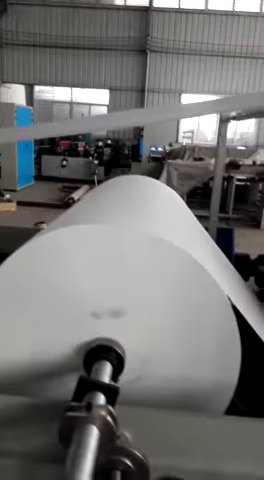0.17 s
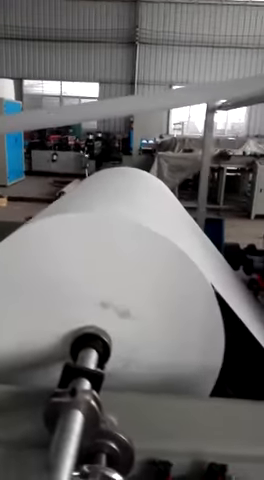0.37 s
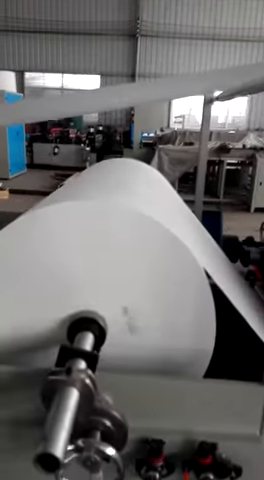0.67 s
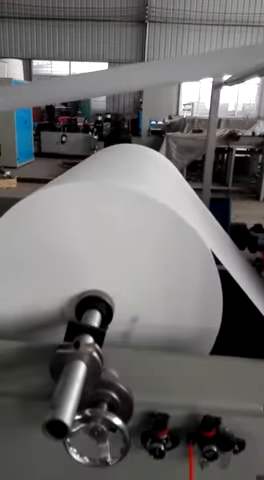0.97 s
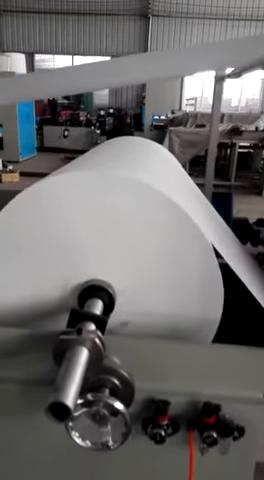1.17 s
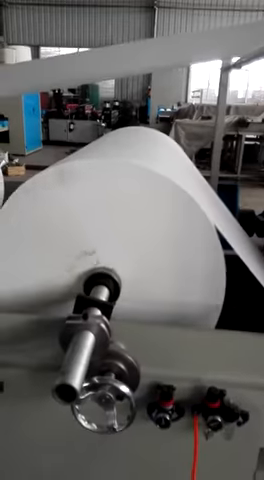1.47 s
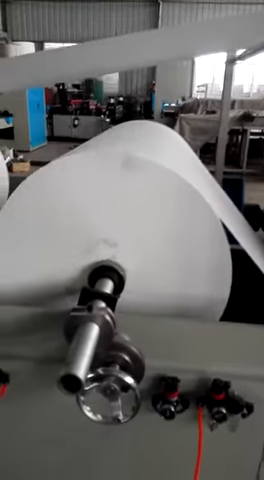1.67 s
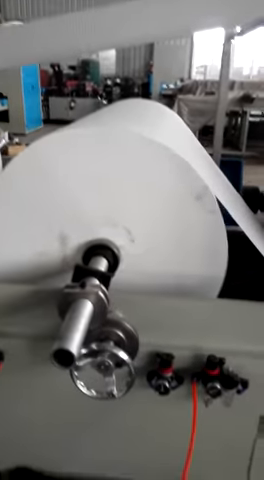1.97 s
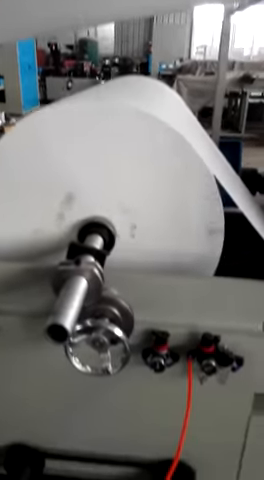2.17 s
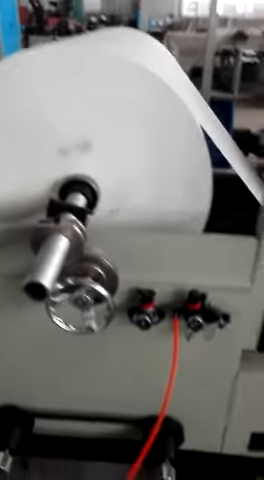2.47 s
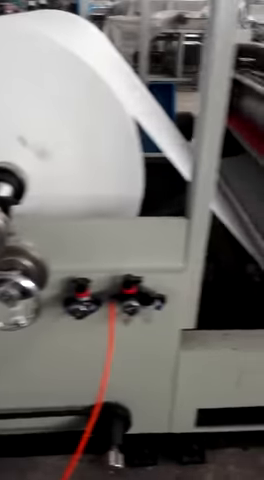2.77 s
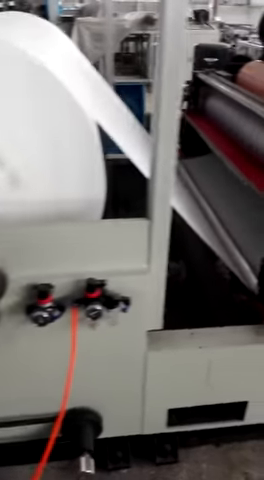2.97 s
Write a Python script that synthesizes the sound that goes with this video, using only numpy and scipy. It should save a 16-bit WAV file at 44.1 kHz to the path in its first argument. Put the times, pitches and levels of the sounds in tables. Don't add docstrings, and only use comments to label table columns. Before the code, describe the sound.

Paper converting machine running: strong constant low hum, quick mechanical knocks, airy roller noise, overdriven sound.

```python
import sys
import numpy as np
from scipy import signal
from scipy.io import wavfile
from scipy.ndimage import uniform_filter1d

SR = 44100
rng = np.random.default_rng(int(sys.argv[2]) if len(sys.argv) > 2 else 0)


def wav_record(signal):
    frames = np.transpose(np.atleast_2d(signal))
    bounded = np.clip(frames, -1, 1)
    quanta = np.round(bounded * 32767).astype(np.int16)
    wavfile.write(sys.argv[1], SR, quanta)


def decibels_to_gain(level_db):
    exponent = np.asarray(level_db, float) / 20
    return 10 ** exponent


N = 138033


def evened(x):
    return x / np.sqrt(np.mean(x ** 2) + 1e-20)


def resonate(x, hz, width):
    turn = np.exp(2j * np.pi * hz * np.arange(len(x)) / SR)
    r = np.exp(-np.pi * width / SR)
    return 2 * (turn * signal.lfilter([1 - r], [1, -r], x / turn)).real


def struck(start_s, rise_s, t60_s):
    t = np.maximum(np.arange(N) / SR - start_s, 0)
    decay = decibels_to_gain(-60 * np.minimum(t / t60_s, 3))
    return np.minimum(t / rise_s, 1) * decay


def drone():
    drone_hz, first_rise_s, drone_db = 125.495, .00098, .55
    wobble_hz, wobble_db = 30, -27
    t = np.arange(N) / SR - first_rise_s
    tone = np.sin(2 * np.pi * drone_hz * t)
    air = resonate(rng.standard_normal(N), drone_hz, wobble_hz)
    air = resonate(air, drone_hz, wobble_hz)
    return decibels_to_gain(drone_db) * tone + decibels_to_gain(wobble_db) * evened(air)


def knocks():
    # peak_s, peak_db
    blow_table = [(.075, -24.5), (0.093, -29), (0.259, -32.5), (0.311, -37.5), (.425, -30.5), (0.472, -26),
                  (.66, -38), (0.751, -32.5), (.865, -26.5), (.91, -28.5), (1.053, -24.5), (1.083, -31.5),
                  (1.271, -28.5), (1.384, -32), (1.535, -20.5), (1.684, -28), (1.718, -24), (1.849, -35),
                  (1.903, -31), (1.95, -25.5), (2.075, -32), (2.125, -21.5), (2.285, -31), (2.325, -31.5),
                  (2.49, -21), (2.574, -24.5), (2.675, -27), (2.747, -25), (2.918, -20.5), (3.083, -25.5)]
    # centre_hz, width_hz, level_db
    frame_modes = [(970, 100, -17.5), (1347, 570, 10.5), (2060, 1200, -11), (3140, 710, 9)]
    knock_rise_s, knock_t60_s, knock_db = .016, .18, 1.5
    clank_s, clank_db, clank_t60_s = 1.1665, -17.5, .045
    thump_hz, thump_db, thump_t60_s = 180, -19, .12

    rattle = rng.standard_normal(N)
    ringing = sum(decibels_to_gain(db) * evened(resonate(rattle, hz, width)) for hz, width, db in frame_modes)
    blows = sum(decibels_to_gain(db + knock_db) * struck(s - knock_rise_s / 2, knock_rise_s, knock_t60_s)
                for s, db in blow_table)
    clank = decibels_to_gain(clank_db) * struck(clank_s, .0006, clank_t60_s)
    thump_tone = np.sin(2 * np.pi * thump_hz * (np.arange(N) / SR - clank_s))
    thump = decibels_to_gain(thump_db) * struck(clank_s, .003, thump_t60_s) * thump_tone
    return evened(ringing) * (blows + clank) + thump


def whirr():
    # pitch_hz, level_db (per Hz)
    spectrum = [(30, -14), (110, 7.5), (180, 4.5), (320, 0), (650, -17), (1400, -14.5), (2400, -19.5),
                (3350, -16.5)]
    # centre_s, change_db
    lulls = [(.165, -7), (.205, -8), (.395, 1), (.6, -13.5), (.8, -7), (.845, -8), (0.999, -1.5),
             (1.224, -2.5), (1.62, -1), (2.215, -11), (2.42, -5), (2.821, -5), (3.04, -0.5)]
    lull_s = 0.016
    folds_per_s, fold_crest_s, fold_db = 4.95, 0.066, .8
    whirr_db, patchy_db, flicker_db = -22.5, 1.5, .7

    frames, hz = N // 256 + 5, np.fft.rfftfreq(1024, 1 / SR)
    t = np.arange(frames) * 256 / SR
    real, imaginary, patches = rng.standard_normal((frames, 513, 3)).T
    patches = uniform_filter1d(patches, size=12, axis=0)
    patches = evened(uniform_filter1d(patches, size=8, axis=1))
    flicker = evened(uniform_filter1d(rng.standard_normal(frames), size=3))
    fold = np.cos(2 * np.pi * folds_per_s * (t - fold_crest_s))
    slack = sum(db * np.exp(-((t - s) / lull_s) ** 2) for s, db in lulls)

    pitch_hz, level_db = np.transpose(spectrum)
    steady_db = np.interp(np.log(hz + 1), np.log(pitch_hz + 1), level_db)[:, None]
    treble_share = (hz / (hz + 700))[:, None]
    moving_db = treble_share * (flicker_db * flicker + fold_db * fold + slack)
    z = (real + 1j * imaginary) * decibels_to_gain(steady_db + patchy_db * patches + moving_db)
    z = z * (hz < 5000)[:, None]
    noise = signal.istft(z, nperseg=1024, noverlap=768)[1][:N]
    return decibels_to_gain(whirr_db) * evened(noise)


def scene():
    return (drone() + knocks() + whirr())[None]


def microphone(pressure):
    return signal.sosfiltfilt(signal.butter(7, 3685, fs=SR, output="sos"), pressure)


def limiter(x):
    split_hz, look_ahead_s = 700, .00115
    hold_level, hold_width, chatter, nerves = .77, .045, 2.8, 3.0
    squash_to, squash_gain = .9, .845
    headroom, crest_lift, rail = .78, 1.0, .707
    duck_s, duck_length_s, duck_db, duck_grip = 1.1725, .004, -4.0, .45

    n = np.arange(N)
    bass = signal.sosfiltfilt(signal.butter(3, split_hz, fs=SR, output="sos"), x)
    treble = x - bass
    busy = uniform_filter1d(abs(treble), size=200)
    duck = np.exp(-((n / SR - duck_s) / duck_length_s) ** 4)

    ahead = abs(np.interp(n + look_ahead_s * SR, n, bass))
    ahead = ahead - chatter * treble * np.sign(bass)
    ahead = ahead + nerves * (busy - busy.mean()) + duck_grip * duck
    hold = uniform_filter1d(.5 + .5 * np.tanh((ahead - hold_level) / hold_width), size=5)

    squashed = squash_gain * decibels_to_gain(duck_db * duck) * squash_to * np.tanh(bass / squash_to)
    held = hold * squashed + (1 - hold) * np.clip(bass, -headroom, headroom)
    crest = np.minimum(abs(held) / rail, 1) ** 6
    return np.clip(held + treble * (1 + crest_lift * crest), -rail, rail)


def stitch(x):
    stitch_s, step_back_s = 1.4233, .00072
    n = np.arange(N)
    return x[n - (n > stitch_s * SR) * round(step_back_s * SR)]


def roll_off(x):
    return signal.sosfilt(signal.butter(12, 15900, fs=SR, output="sos"), x)


def record(dry):
    limited = limiter(microphone(dry[0]))
    return roll_off(stitch(limited)[None])


dry = scene()
out = record(dry)
wav_record(out)
```